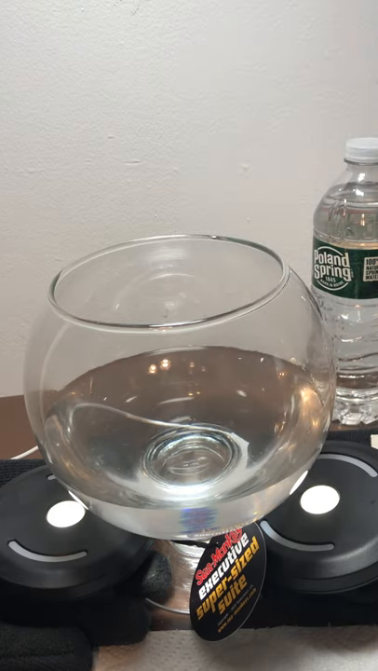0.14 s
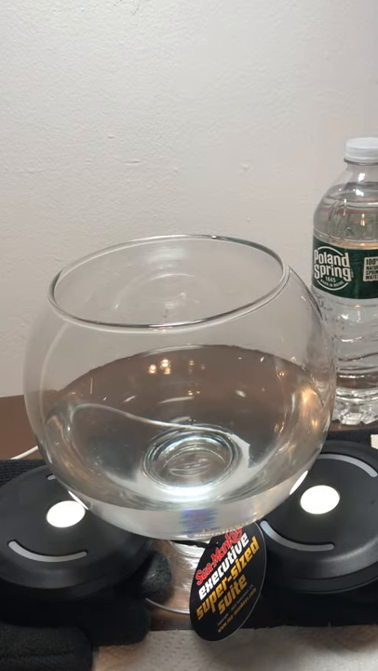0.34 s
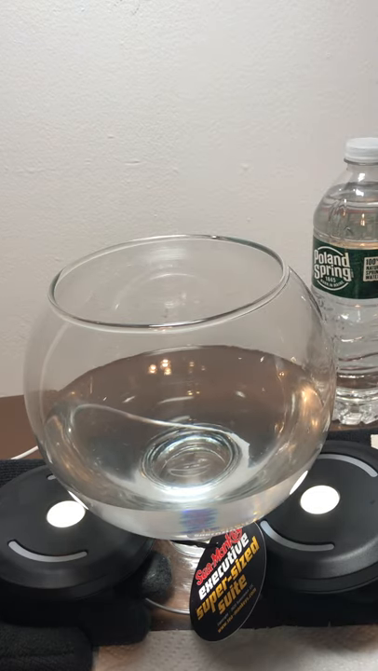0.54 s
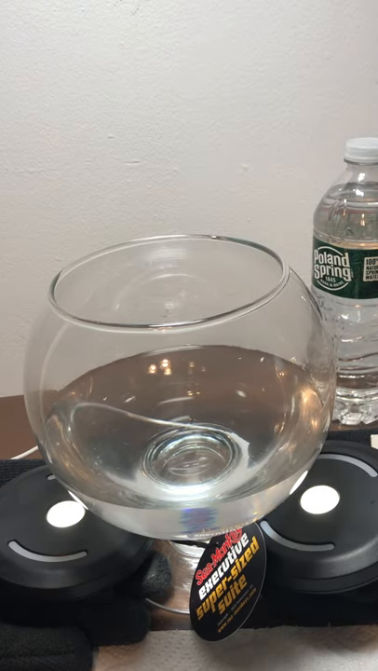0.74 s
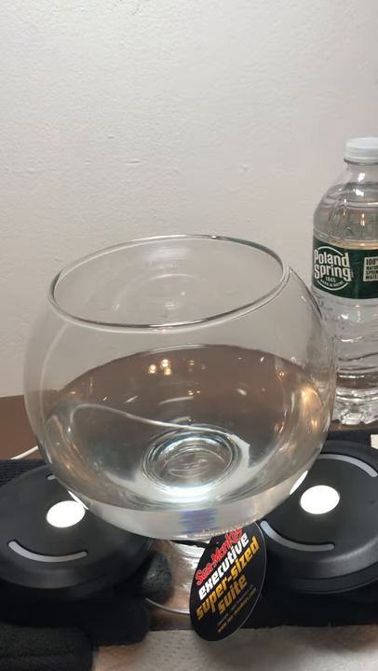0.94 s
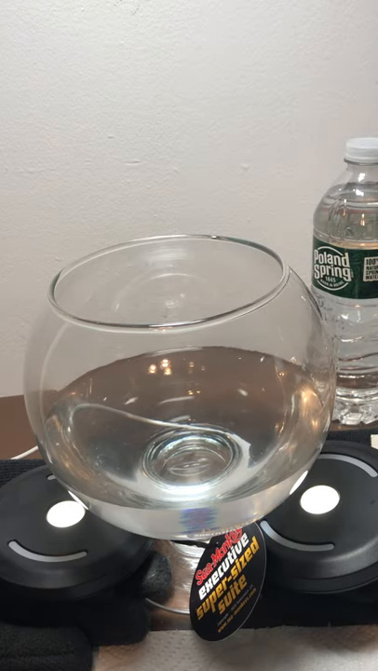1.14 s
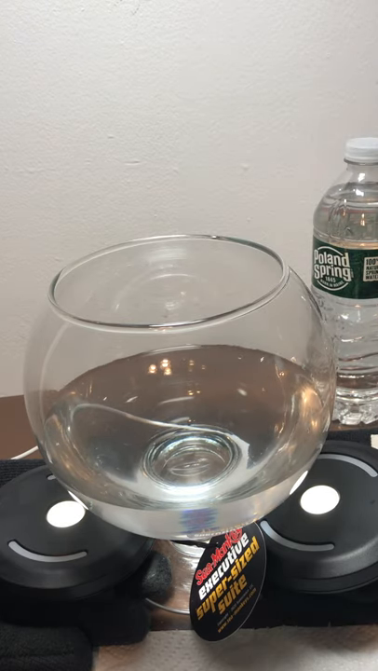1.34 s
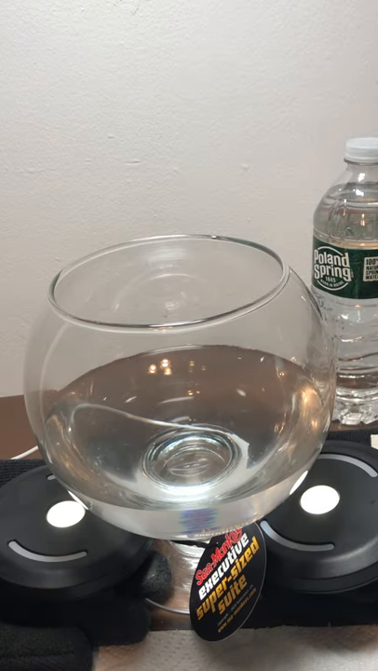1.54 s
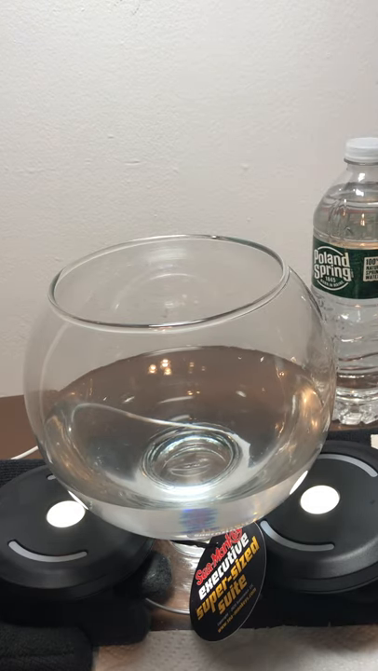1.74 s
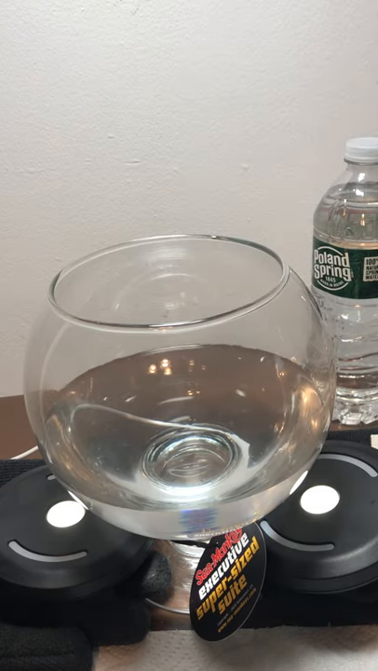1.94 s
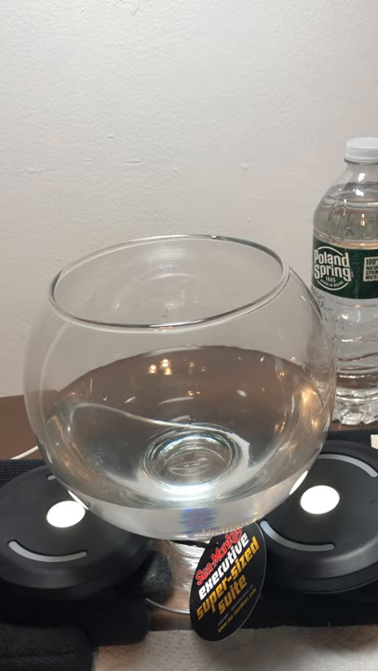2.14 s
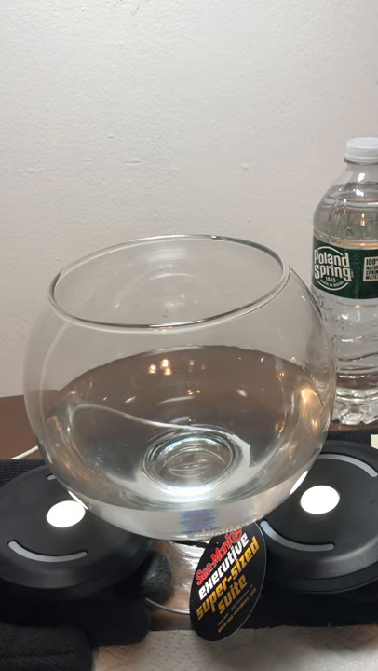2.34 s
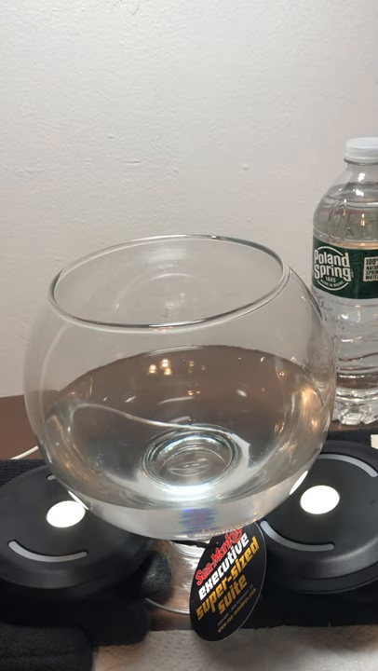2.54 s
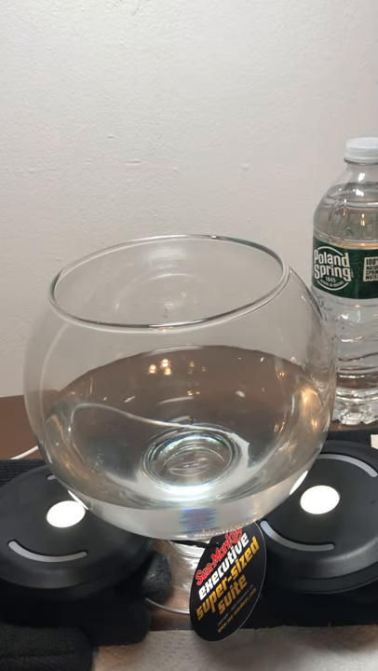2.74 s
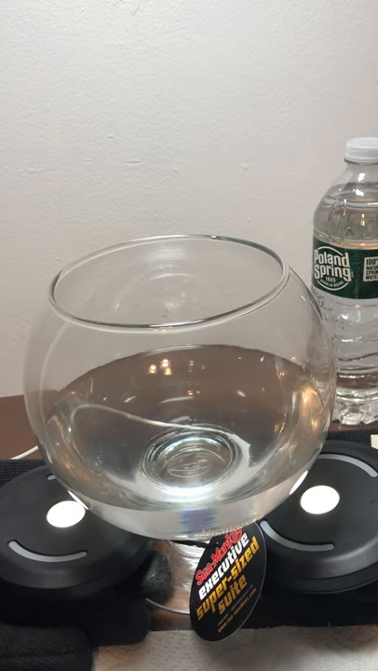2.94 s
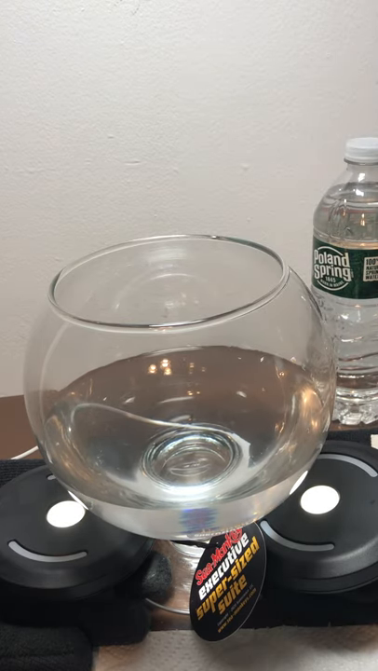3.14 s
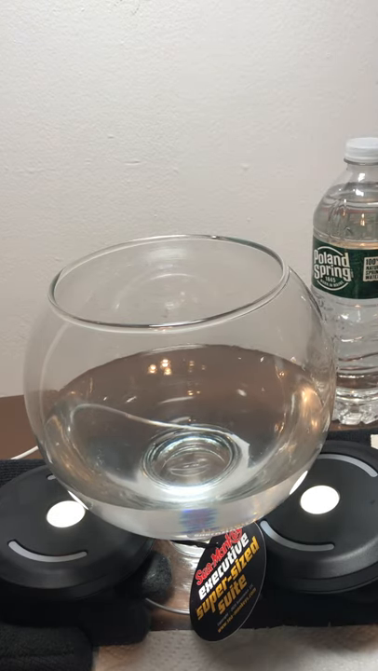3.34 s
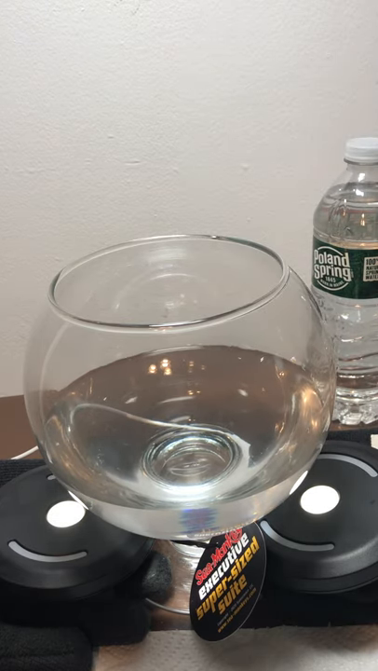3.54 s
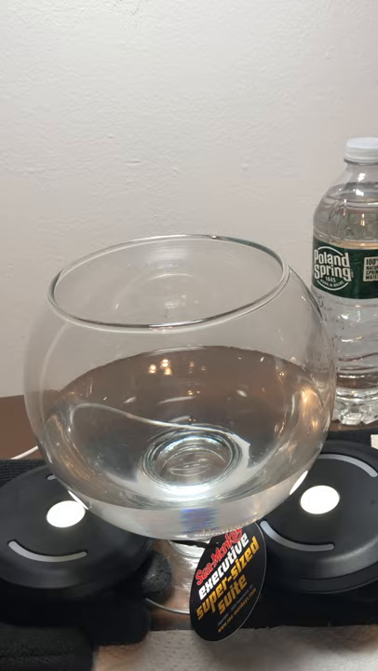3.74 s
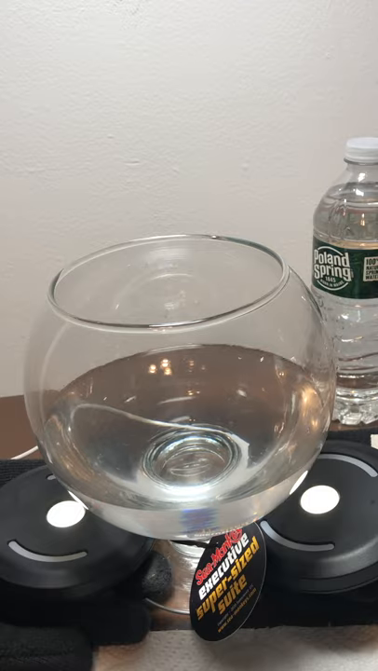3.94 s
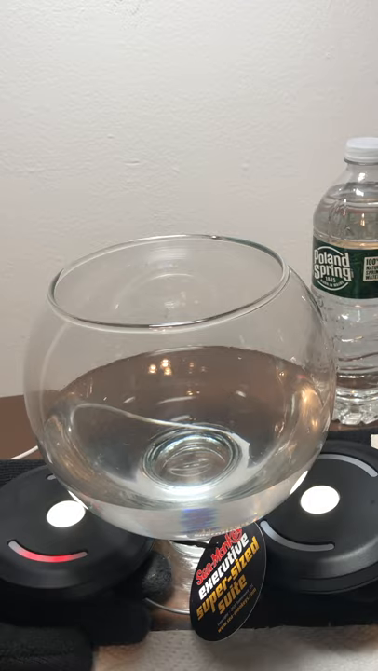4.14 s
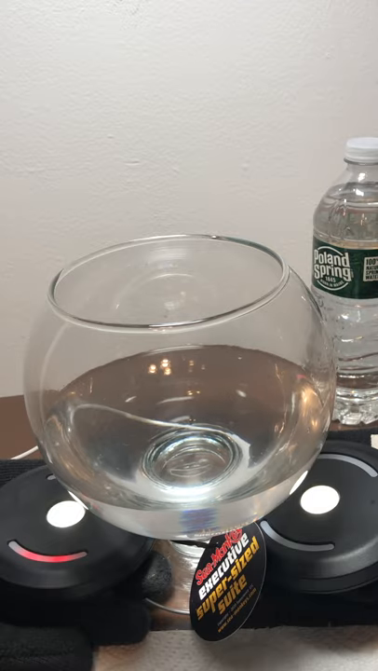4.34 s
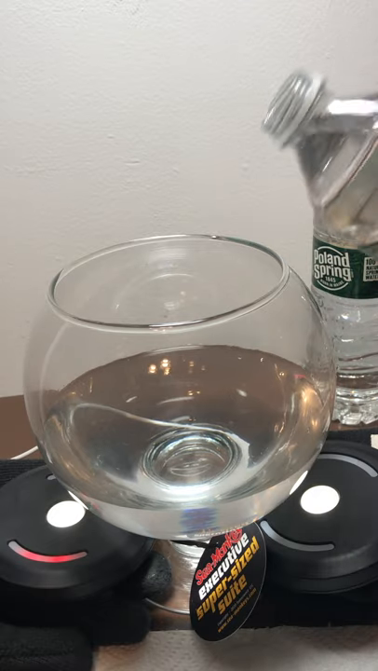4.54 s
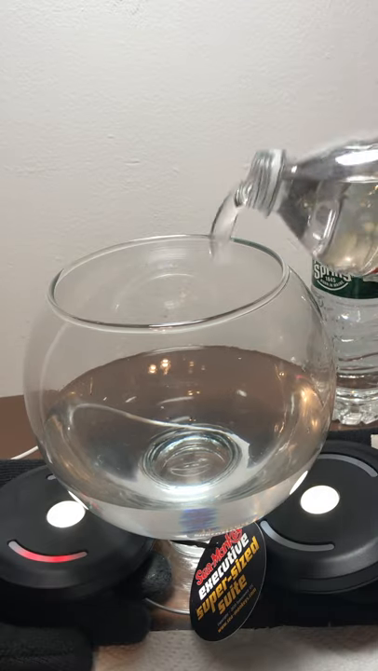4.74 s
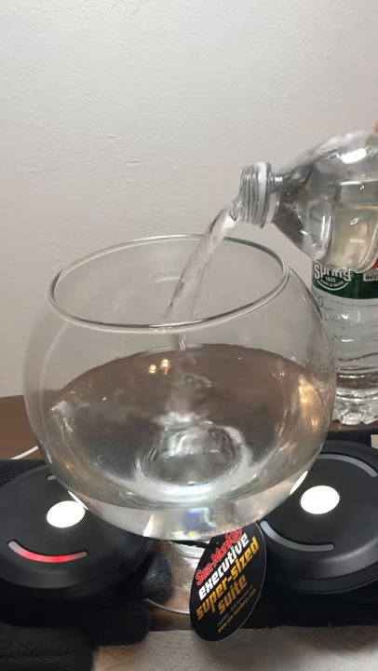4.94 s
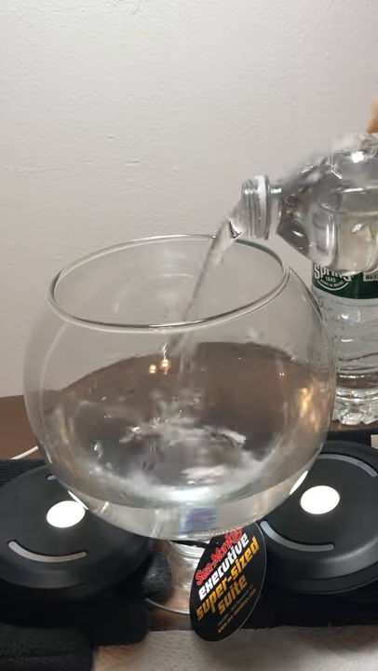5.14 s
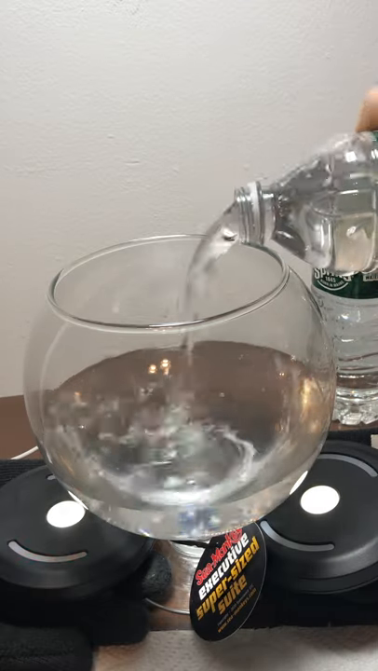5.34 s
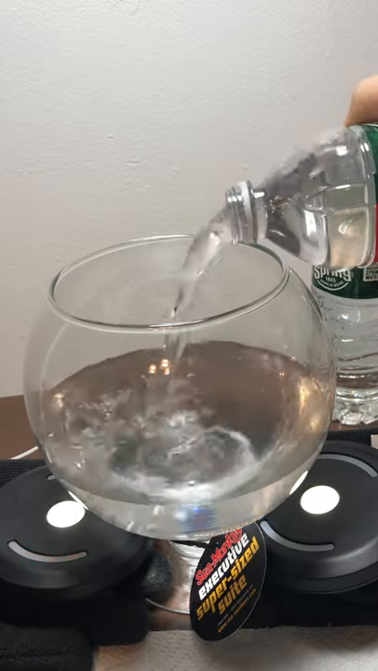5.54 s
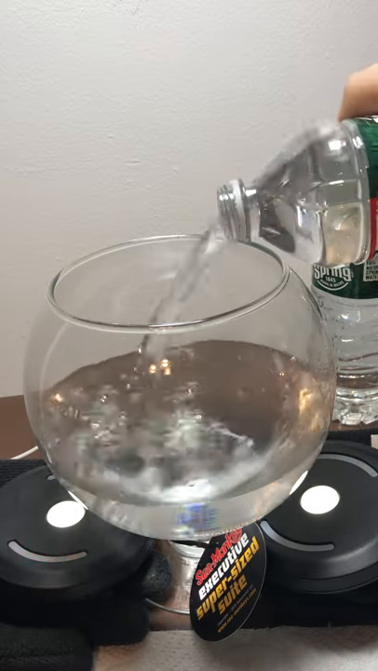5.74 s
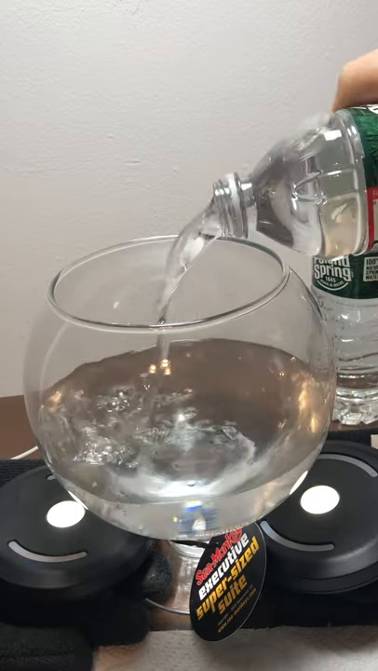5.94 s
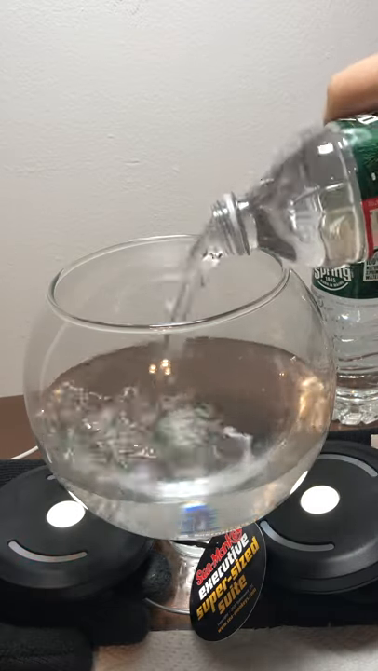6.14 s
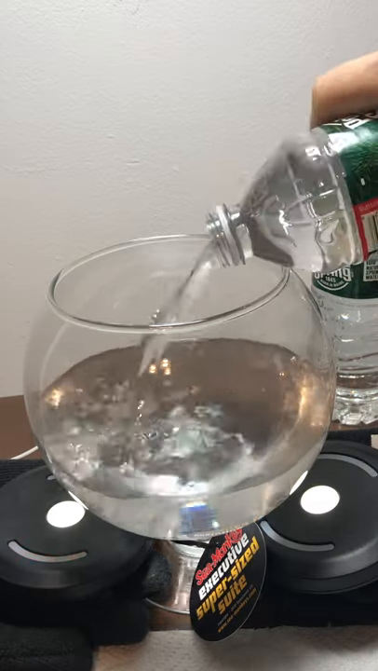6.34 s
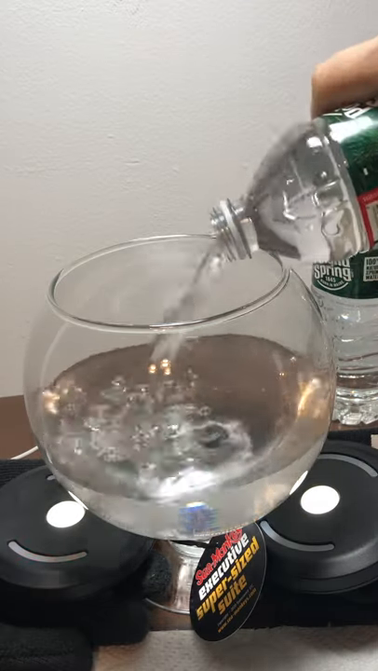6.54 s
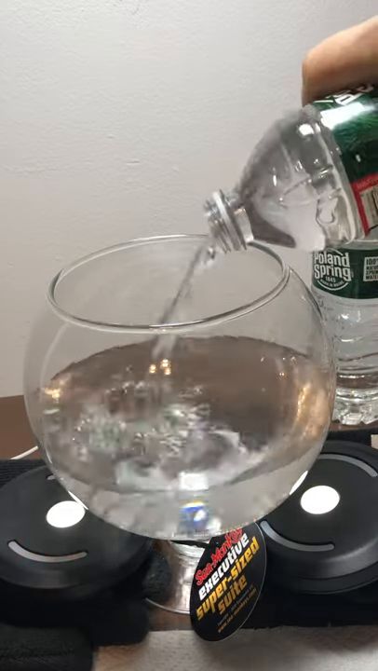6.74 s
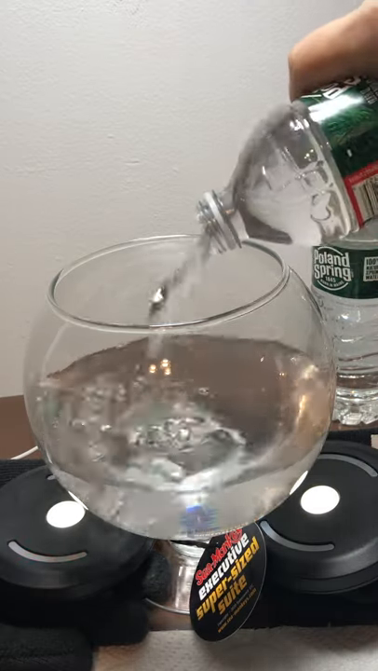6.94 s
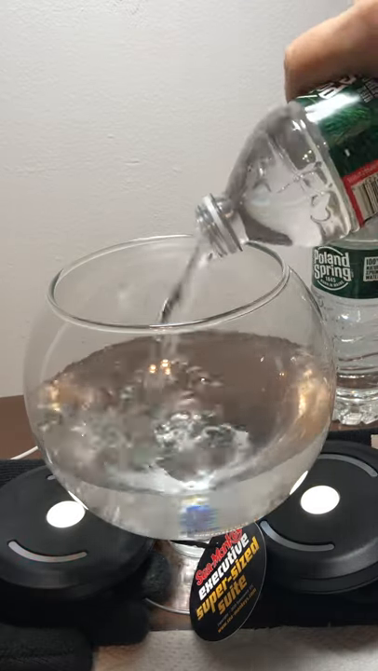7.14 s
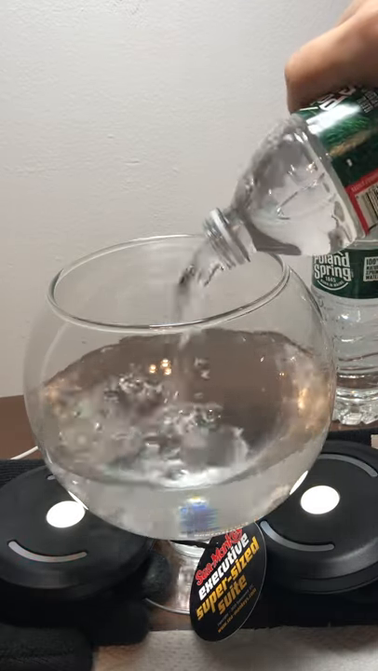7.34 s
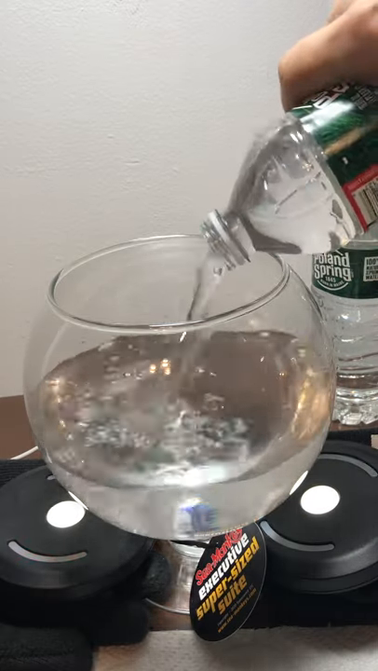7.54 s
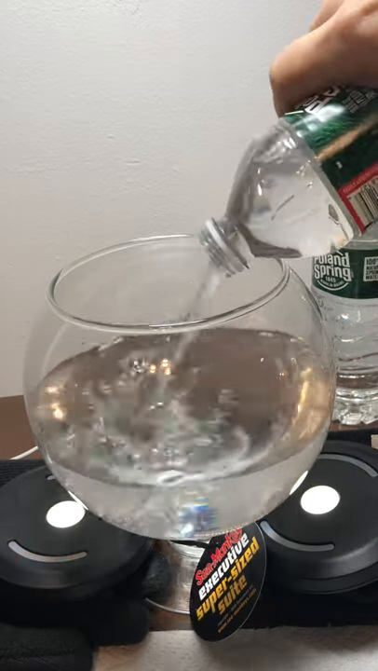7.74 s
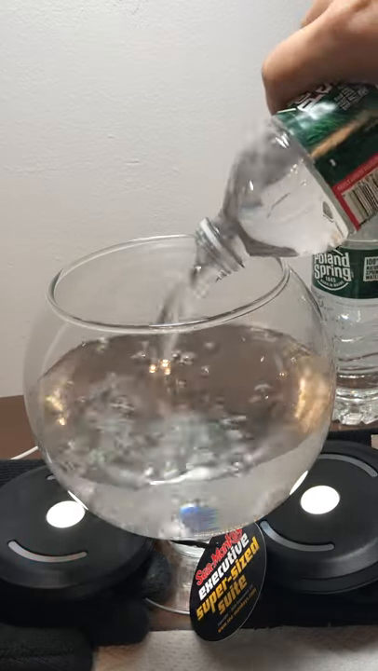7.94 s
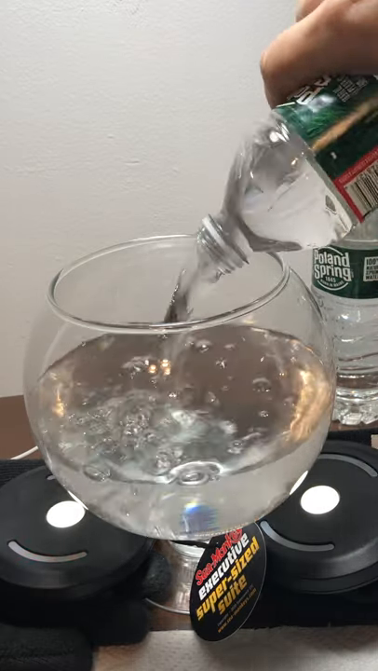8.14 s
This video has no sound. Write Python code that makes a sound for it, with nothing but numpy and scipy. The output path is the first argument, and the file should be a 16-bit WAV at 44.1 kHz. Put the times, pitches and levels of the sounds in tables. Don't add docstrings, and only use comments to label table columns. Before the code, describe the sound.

Light plastic snaps and a sharp cap crack, a pause, then lively bubbling water pouring into a round glass bowl, growing fuller until cut off.

```python
import sys
import numpy as np
from scipy import signal
from scipy.fft import rfft, irfft, next_fast_len
from scipy.io import wavfile
from scipy.ndimage import uniform_filter1d

SR = 44100
rng = np.random.default_rng(int(sys.argv[2]) if len(sys.argv) > 2 else 0)


def output_pcm(signal):
    pcm = np.clip(np.atleast_2d(signal).T, -1, 1) * 32767
    wavfile.write(sys.argv[1], SR, np.round(pcm).astype(np.int16))


def natural_amplitude(level_db):
    exponent = np.asarray(level_db, float) / 20
    return 10 ** exponent


N = 361619
TIME = np.arange(N) / SR

# start_s, flow_db
POUR = [(4.94, -78), (5.12, -69), (5.67, -65), (6.07, -61.5), (6.35, -62.5), (6.58, -59), (6.81, -61),
        (7.13, -57.5), (7.48, -63.5), (8.1, -56.5), (8.2, -56.5)]
# start_s, level_db, pitch_hz, t60_s
DEEP_BUBBLES = [(5.586, -47, 498, 0.067), (5.758, -46, 530, 0.021), (5.885, -55, 460, 0.037),
                (6.063, -49.5, 479, 0.18), (6.425, -48, 482, 0.15), (6.54, -51, 527, .08),
                (6.85, -42, 482.5, 0.15), (7.048, -35.5, 509.3, 0.12), (7.145, -36.5, 511, 0.067),
                (7.293, -45, 499, 0.12), (7.335, -52, 500, 0.1), (7.446, -28, 460, 0.042),
                (7.577, -32, 521, 0.044), (7.709, -50, 494, 0.12), (7.814, -32, 489.7, 0.17),
                (7.91, -39, 462.7, 0.042), (8.027, -42, 489, 0.23), (8.11, -34.5, 466, 0.037)]
# start_s, level_db, pitch_hz, t60_s
SLUGS = [(4.981, -34.5, 572, 0.1), (5.257, -51, 658, 0.097), (5.302, -47, 592, 0.11),
         (5.432, -36, 558.4, 0.095), (5.585, -53.5, 594, 0.11), (5.682, -43.5, 723, 0.046),
         (5.919, -44, 634, 0.054), (6.411, -42, 590.7, 0.031), (6.518, -49, 615, 0.075),
         (6.62, -38.5, 639, 0.096), (6.738, -33, 623, 0.086), (6.846, -32, 647.4, 0.04),
         (7.048, -34.5, 654, 0.066), (7.142, -31.5, 630, 0.021), (7.263, -35, 623, 0.095),
         (7.287, -46, 636, 0.03796), (7.43, -47.5, 679, 0.058), (7.445, -28.5, 633, 0.089),
         (7.575, -33, 669.5, 0.091), (7.685, -32, 613, 0.055), (7.799, -31.5, 634, 0.018),
         (7.811, -30.5, 615, 0.027), (7.941, -34.5, 589.4, 0.022), (8.023, -40.5, 659, 0.091),
         (8.109, -47, 645, 0.071), (8.138, -39.5, 616, 0.057)]
# start_s, level_db
PLOPS = [(5.435, -47.5), (5.504, -55), (5.627, -52), (5.764, -50.5), (6.135, -55), (6.258, -50.5),
         (6.375, -52), (6.483, -49), (7.164, -44), (7.447, -42), (7.578, -48), (7.811, -48), (7.934, -50)]
# start_s, level_db, pitch_hz, t60_s
RISING_BUBBLES = [(5.184, -42, 690, 0.053), (5.239, -50, 790, 0.061), (5.3, -46, 890, 0.038),
                  (5.578, -36, 744, 0.016), (5.622, -42, 873, 0.032), (5.681, -34, 740, 0.019),
                  (6.061, -32, 773, 0.02), (6.277, -50, 859, 0.043), (6.427, -38, 717, 0.093),
                  (6.544, -32.5, 756, 0.041), (7.057, -39, 745, 0.067), (7.457, -24.5, 679, 0.051),
                  (7.614, -39.5, 676, 0.071), (7.811, -29.5, 870, 0.029), (7.932, -28, 750, 0.019),
                  (8.142, -21.5, 720, 0.021)]
# start_s, level_db, starting_pitch_hz
CHIRPS = [
    (5.455, -51, 794),
    (5.695, -49.5, 450),
    (5.88, -63, 1030),
    (6.185, -51, 484),
    (7.012, -46, 736),
    (7.2, -50, 470),
    (7.228, -45.5, 850),
    (8.03, -45.5, 980),
]
# start_s, level_db, pitch_hz
GULPS = [(4.974, -56, 910), (5.238, -50, 1460), (5.3018, -58, 920), (5.6217, -43, 520), (5.68, -40, 920),
         (5.7541, -51.5, 1480), (6.016, -41, 645), (6.287, -46, 570), (6.4073, -59, 1100),
         (6.541, -39, 992), (6.7286, -44.5, 1422), (6.8358, -40, 1030), (7.0123, -50, 1150),
         (7.1416, -53, 1090), (7.2573, -47, 920), (7.4276, -47, 950), (7.4454, -33.5, 1020),
         (7.5728, -49, 908), (7.681, -48, 1030), (7.797, -37, 860), (7.905, -47, 902), (7.931, -42, 1390),
         (7.9332, -40, 1040), (8.0222, -45, 978.4), (8.1354, -41, 954)]
# start_s, level_db, pitch_hz
SMALL_BUBBLES = [(5.205, -50, 940), (5.2552, -44.5, 1600), (5.14, -52.5, 2190), (5.27, -56, 2620),
                 (5.285, -52, 1620), (5.612, -57.5, 2660), (5.81, -49, 1710), (5.865, -58, 2100),
                 (5.93, -44, 953), (6.3, -53, 864), (6.162, -55, 1106), (6.4247, -39.5, 1079),
                 (6.848, -37, 920), (7.1793, -40, 1048), (7.2885, -37, 1085), (7.478, -37, 964.4),
                 (7.538, -47, 2670), (7.64, -51, 1009), (7.7005, -45, 1060), (7.787, -43, 2340),
                 (7.7964, -42, 896)]
# crest_s, hold_s, level_db, crest_pitch_hz, fading_pitch_hz
SINGING = [(4.995, 0.031, -66, 570, 625), (5.167, 0.0081, -54, 656, 727), (5.329, 0.0073, -53, 610, 660),
           (5.459, 0.076, -55, 578, 700), (5.761, 0.04, -56, 695, 670), (5.938, 0.021, -49.5, 590, 640),
           (6.034, 0.13, -55.5, 616, 695), (6.193, 0.079, -57, 579.9, 650.2), (6.323, 0.26, -58, 635, 640),
           (6.654, 0.034, -46.5, 616, 630), (6.767, 0.0055, -47.5, 634, 700),
           (6.876, 0.068, -43.5, 630, 640), (7.088, 0.047, -38, 640, 645), (7.286, 0.035, -40.5, 635, 650),
           (7.503, 0.071, -44.5, 630, 636), (7.599, 0.017, -39, 627, 691.4), (7.85, 0.01, -42, 615, 620),
           (7.898, 0.01, -41.5, 632, 641.5), (7.975, 0.042, -46.5, 633.4, 650),
           (8.19, 0.019, -47.5, 619, 619)]
# start_s, level_db, first_droplet_pitch_hz
SPRAYS = [(4.9793, -36.5, 4900), (5.0404, -44, 4830), (5.29, -38.5, 8000), (5.599, -40.5, 4160),
          (5.639, -42, 9300), (5.6812, -36, 8300), (5.7914, -40.5, 10450), (5.9288, -41.5, 7260),
          (5.9556, -42.5, 6500), (5.999, -40, 5777), (6.0779, -43, 4860), (6.185, -41.5, 5860),
          (6.425, -31, 9100), (6.5401, -31.5, 7320), (6.6227, -40, 6400), (7.1605, -30.5, 7710),
          (7.2584, -34.5, 9110), (7.4895, -36, 12600), (7.679, -39, 3270), (7.812, -28, 6960),
          (7.9348, -25, 8110), (8.022, -29, 3360), (8.1069, -40, 7060), (8.157, -31, 9400)]
# start_s, level_db, first_droplet_pitch_hz
PLINKS = [(5.1313, -43.5, 3950), (5.1483, -34.5, 3510), (5.468, -38, 6200), (5.8101, -33.5, 6200),
          (6.038, -42, 5550), (6.518, -39.5, 5160), (6.7358, -29, 8000), (6.8442, -23.5, 4920),
          (6.9755, -39, 4578), (7.058, -23.5, 5050), (7.143, -27, 5765), (7.1976, -37, 7680),
          (7.442, -27, 3163), (7.575, -24, 3420), (7.6888, -23, 6850), (7.893, -39, 3450),
          (7.911, -26, 12160), (8.0002, -54, 6460)]
# start_s, level_db, pitch_hz
SPITS = [(4.9531, -51, 4860), (5, -37, 6250), (5.018, -39, 4950), (5.067, -44, 7100), (5.0848, -50, 6920),
         (5.1844, -51, 6000), (5.279, -45, 4260), (5.302, -40, 8400), (5.431, -46.5, 5900),
         (5.445, -41.5, 6440), (5.6114, -40.5, 4920), (5.8007, -37.5, 6350), (5.8974, -44, 6356),
         (6.0588, -42.5, 4854), (6.0923, -37.5, 7820), (6.1281, -44.5, 7300), (6.168, -45, 5000),
         (6.2024, -43, 8700), (6.2281, -55, 8500), (6.2701, -39.5, 5010), (6.344, -48, 4640),
         (6.4117, -31, 4740), (6.4839, -41, 9070), (6.506, -39, 4970), (6.6003, -58, 3940),
         (6.633, -31.5, 9100), (6.691, -52, 3550), (6.7248, -33, 8120), (6.806, -48, 4000),
         (6.9124, -38, 7100), (7.043, -32, 5200), (7.097, -43, 4560), (7.2085, -39.5, 3778),
         (7.232, -46, 8820), (7.2717, -33, 9130), (7.3372, -46, 8700), (7.426, -45, 6830),
         (7.4412, -37, 5980), (7.547, -46, 3366), (7.584, -32, 9000), (7.715, -41, 3700),
         (7.7356, -41, 7800), (7.7737, -46, 7780), (7.985, -41, 6350), (8.077, -43, 3460)]
# start_s, level_db, pitch_hz
MIST = [(4.9854, -36, 9400), (5.0404, -38, 13900), (5.0779, -41, 10400), (5.3887, -51, 15200),
        (5.5564, -48, 10100), (5.6388, -58, 9980), (5.9479, -42, 11700), (6.1484, -42, 15200),
        (6.1894, -44, 12900), (6.3355, -42.5, 11900), (6.3699, -37, 15100), (6.4067, -41, 10900),
        (6.47, -54, 9500), (6.6697, -49, 13790), (7.0212, -40.5, 11690), (7.0891, -37, 13400),
        (7.2085, -54, 12000), (7.3302, -35.5, 11300), (7.3594, -44, 10900), (7.4736, -50, 12230),
        (7.6316, -47, 14700), (7.66, -46, 9600), (8.0396, -27.5, 10980), (8.1342, -44, 10780)]
# (start_s, level_db)
KNOCKS = [
    (1524, 0.19, [(5.207, -56), (5.4745, -58.5), (5.675, -55.5), (5.78, -63), (6.0839, -56), (6.2, -61), (6.4437, -52.5), (6.7293, -48), (6.859, -47), (7.258, -50), (7.4948, -48.5), (7.5814, -49), (7.6806, -57.5), (7.8136, -52.5), (8.0494, -52.5), (8.1914, -43.5)]),
    (1720, 0.63, [(5.655, -58.5), (6.065, -68), (6.6476, -61), (7.33, -69)]),
    (2375, 0.086, [(5.63, -63), (5.9, -61), (6.0156, -53), (6.386, -55), (6.54, -48.5), (6.8354, -44), (7.2569, -46), (7.4444, -38.5)]),
    (9000, 0.067, [(6.636, -43.5), (6.852, -50)]),
    (2970, 0.072, [(5.15, -57), (5.31, -63), (5.43, -67), (5.52, -63), (5.78, -59), (5.915, -60), (6.0156, -50), (6.27, -51), (6.4255, -48), (6.5174, -44.5), (6.54, -44.5), (6.62, -54), (6.7287, -43), (6.8505, -49), (7.0423, -47), (7.5757, -37), (7.7132, -44), (7.8109, -40), (7.93, -48), (8.0233, -41), (8.06, -55), (8.13, -54)]),
]
# pitch_hz, width_hz, level_db
GLASS = [(1534, 47, 1), (1748, 4.3, -8.5), (2400, 23, -6.5), (2970, 45, 0), (3450, 300, -15)]
# freq_hz, density_db (per Hz)
FIZZ = [(2600, -20), (4000, -9.5), (7000, -12.5), (11000, -23), (16000, -10)]
# freq_hz, density_db (per Hz)
CHURN = [(60, -6), (120, 6.5), (300, 3), (450, 0), (900, -5), (1400, -9.5), (2200, -16.5), (4000, -72)]
# start_s, level_db, centre_hz
CRACKLES = [(0.585, -56, 2390), (0.6144, -50, 9400), (0.7188, -54.5, 3270), (0.939, -41, 4220),
            (1.0804, -39.5, 7300), (1.0798, -46.5, 1880), (1.155, -55, 4340), (1.1944, -58, 2780),
            (1.355, -63, 9000), (1.375, -55, 2650), (1.4, -64, 9500), (1.6235, -53.5, 2080),
            (1.664, -52.5, 6360), (1.715, -65, 6000), (2.7118, -30, 8200), (1.775, -38, 7360),
            (1.7766, -48.5, 3500), (1.937, -37.5, 7140), (2.1126, -46, 3200), (2.145, -59, 4800),
            (2.6893, -26, 8800), (2.412, -58, 2960), (2.533, -45, 9000), (2.649, -47, 1760),
            (2.6896, -19, 4670), (2.7123, -28, 3800), (2.922, -52, 3080), (3.079, -54.5, 3080),
            (3.117, -71, 3260), (3.1399, -44, 2970), (3.335, -58, 3500), (4.4552, -55.5, 4030)]
# start_s, level_db, pitch_hz, t60_s
PINGS = [(0.006, -59, 800, 0.49), (0.072, -65, 1370, 0.2), (1.6221, -51, 2000, 0.036),
         (2.229, -57.5, 1460, 0.038), (1.0804, -48, 1165, 0.013), (1.375, -55, 1010, 0.021),
         (1.6235, -59, 790, 0.05), (2.65, -46.5, 1320, 0.033), (2.651, -47, 780, 0.016),
         (2.6894, -48, 638.9, 0.011), (2.6896, -29.5, 3180, 0.011), (2.7112, -32, 3640, 0.026),
         (.9393, -56, 830, .015), (.7183, -53, 3500, 0.027), (3.1398, -56, 1050, 0.048),
         (3.337, -49, 1410, 0.035)]
# start_s, length_s, level_db, centre_hz, width_share (of the centre)
RUSTLE = [(0, 0.26, -63.5, 975, 1.2), (0, 0.31, -68, 2700, 0.71), (0.579, 0.25, -64.5, 267, 0.57),
          (1.104, 0.062, -64.5, 197, 0.51), (1.125, 0.12, -64.5, 8000, 3.3), (1.932, 0.048, -62, 280, 0.49),
          (2.264, 0.13, -62, 283, 0.7), (2.247, 0.16, -67, 7900, 3.5), (2.691, 0.095, -59, 135, 0.77),
          (3.062, 0.12, -69, 2370, 1.6), (3.716, 0.25, -75.5, 9000, 2.6), (3.977, 0.14, -67.5, 7550, 2.7)]
# freq_hz, density_db (per Hz)
AIR = [(24, -51), (66, -9.5), (101, 2), (467, -9.5), (1600, -18.5), (2400, -14.5), (5300, -23),
       (15500, -33)]
# line_hz, line_db, rumble_hz, rumble_width_hz, rumble_db
HUM = (59, -66, 131.5, 26, -75)
# pitch_hz, level_db
WHINE = [(4900, -87), (5900, -92.5)]
# freq_hz, t60_s
ROOM = [(300, 0.23), (2000, 0.27), (6000, 0.24), (14000, 0.21)]


def glugs():
    out, t = np.zeros(N), np.arange(1500) / SR
    slap_band = signal.butter(2, [250, 2200], "band", fs=SR, output="sos")
    slaps = evened(signal.sosfilt(slap_band, rng.standard_normal((len(SLUGS), len(t)))))
    sizes, sheds = rng.random(len(SLUGS)), rng.random((len(SLUGS), 5, 3))
    for s, db, hz, t60 in DEEP_BUBBLES:
        add(out, s, bubble(db + 9.5, hz, t60, rise=0.43, plunge=0.28))
    for (s, db, hz, t60), size, slap, shed in zip(SLUGS, sizes, slaps, sheds):
        add(out, s, bubble(db + 8.5, hz, t60, rise=0.54, plunge=0.26))
        push_hz = 200 + 220 * size
        add(out, s, natural_amplitude(db - 3.0) * np.sin(2 * np.pi * push_hz * t) * np.exp(-t / 0.0035))
        add(out, s - 0.002, natural_amplitude(db - 18.5) * slap * np.exp(-t / 0.0083))
        for late, pitch, small in shed:
            shed_db = db - 14.5 - 10 * small - 8 * late
            add(out, s + 0.07 * late, bubble(shed_db, 330 * 5 ** pitch, 0.035, rise=12.0))
    for s, db in PLOPS:
        add(out, s, bubble(db + 6.5, hz=166, t60=0.051, swell_s=0.0041, plunge=-0.41))
    add(out, 7.179, natural_amplitude(-34) * slaps[0] * np.exp(-t / 0.0018))
    for s, db, hz, t60 in RISING_BUBBLES:
        add(out, s, bubble(db + 3, hz, t60, rise=4.25, swell_s=0.002))
    for s, db, hz in CHIRPS:
        add(out, s, bubble(db + 5.5, hz, t60=0.095, rise=11.0, swell_s=0.006))
    for s, db, hz in GULPS:
        add(out, s, bubble(db + 5.0, hz, t60=0.025, swell_s=0.00086, plunge=-0.36))
    for s, db, hz in SMALL_BUBBLES:
        add(out, s, bubble(db + 3, hz, t60=0.033, rise=7, swell_s=0.002))
    return out


def bowl_air():
    swell_db_per_s, fade_db_per_s, quiet_db, glide_s = 256, 385, -65.0, 0.0305
    pitch_waver, level_waver = slow_waver((2, N), 350)
    crest, hold, top_db, crest_hz, fade_hz = np.transpose(SINGING)

    marks = np.maximum.accumulate(np.ravel([crest, crest + hold + glide_s], "F"))
    hz = np.interp(TIME, marks, np.ravel([crest_hz, fade_hz], "F"))

    level_db = np.full(N, quiet_db)
    for at, held, peak_db in zip(crest, hold, top_db):
        early = np.maximum(at - TIME, 0)
        late = np.maximum(TIME - at - held, 0)
        level_db = np.maximum(level_db, peak_db - swell_db_per_s * early - fade_db_per_s * late)

    note = np.sin(2 * np.pi * np.cumsum(hz * (1 + 0.00842 * pitch_waver)) / SR)
    shaken = noise_band(rng.standard_normal(N), hz, 85)
    fade_in = np.clip((TIME - crest[0]) / 0.0092, 0, 1)
    return natural_amplitude(level_db + 1.2 + 1.5 * level_waver) * (note + 0.17 * shaken) * fade_in


def splashes():
    out, t = np.zeros(N), np.arange(2500) / SR
    bursts = [(*row, 0.035, -11.5) for row in SPRAYS] + [(*row, 0.049, -18.5) for row in PLINKS]
    bursts = sorted(bursts)
    scatter = rng.random((len(bursts), 14, 3))
    noise = rng.standard_normal((len(bursts), 2, len(t)))
    for (s, db, hz, t60, hiss_db), drops, (hiss, rag) in zip(bursts, scatter, noise):
        colour_hz = 0.7 * hz + 1500 + 2500 * drops[0, 0]
        hiss = noise_band(hiss, colour_hz, 6500)
        hiss = hiss * natural_amplitude(4.0 * evened(uniform_filter1d(rag, 150)))
        add(out, s, droplet(db - 4.0, hz, cycles=10.0))
        add(out, s, natural_amplitude(db + hiss_db + 4.0 - 60 * t / t60) * (1 - np.exp(-t / 0.0014)) * hiss)
        for late, pitch, size in drops:
            drop_db = db - 10.0 - 14 * late - 8 * size
            add(out, s + 0.58 * t60 * late ** 1.3, droplet(drop_db, 3000 * 5 ** pitch, cycles=5.4))
    return out


def spits():
    out, t = np.zeros(N), np.arange(2500) / SR
    rows = [(*row, 0.035, 0.81) for row in SPITS] + [(*row, 0.032, 0.25) for row in MIST]
    noises, neighbours = rng.standard_normal((len(rows), len(t))), rng.random((len(rows), 3, 2))
    for (s, db, hz, t60, wide), noise, near in zip(rows, noises, neighbours):
        puff = noise_band(noise, hz, wide * hz)
        add(out, s, natural_amplitude(db - 13.0 - 60 * t / t60) * (1 - np.exp(-t / 0.0013)) * puff)
        add(out, s, droplet(db - 9.0, hz, cycles=22.0))
        for late, pitch in near:
            near_hz = min(hz * (0.7 + 0.7 * pitch), 15500)
            add(out, s + 0.013 * late, droplet(db - 11.0, near_hz, cycles=15.6))
    return out


def glass():
    notes = np.zeros(N)
    for hz, width, db in GLASS:
        ring = bubble(0, hz, 2.9 / width, swell_s=0.00077)
        notes += natural_amplitude(db) * evened(signal.oaconvolve(click_train(200, 5.0), ring)[:N])
    out = natural_amplitude(pour_flow_db() - 11) * notes * (TIME > POUR[0][0])
    for hz, t60, hits in KNOCKS:
        for (s, db), off in zip(hits, rng.uniform(-0.95, 1, len(hits))):
            add(out, s, bubble(db, hz * (1 + 0.0141 * off), t60, swell_s=0.00054))
    return out


def fizz():
    fading = np.exp(-np.arange(1500) / SR / 0.0035)
    clumps = [0.08 + signal.oaconvolve(click_train(30, 2.5), fading)[:N] for band in range(8)]
    bubbles = np.zeros(N)
    for k, hz in enumerate(np.geomspace(2600, 15000, 18)):
        grain = droplet(0, hz, cycles=8.0)
        grain = grain / np.linalg.norm(grain) * np.sqrt(hz) * natural_amplitude(read(FIZZ, hz))
        clumping = clumps[k // 3] + clumps[(k + 2) // 3 + 1]
        bubbles += signal.oaconvolve(click_train(450, 2.8) * clumping, grain)[:N]

    lumps = natural_amplitude(3.0 * evened(uniform_filter1d(rng.standard_normal(N), 900)))
    churn = coloured(rng.standard_normal(N) * lumps, CHURN)
    for start, pitch, size in rng.random((300, 3)):
        stray = bubble(11 - 14 * size, 700 * 3.6 ** pitch, 0.03, rise=14.0, swell_s=0.002)
        add(churn, POUR[0][0] + 3.25 * start, stray)

    flow_db = pour_flow_db()
    churn_db = -61.5 + 1.22 * (flow_db + 60)
    return (natural_amplitude(flow_db - 4.5) * evened(bubbles) + natural_amplitude(churn_db) * churn) * (TIME > POUR[0][0])


def crackles():
    out = np.zeros(N)
    for (s, db, hz), noise in zip(CRACKLES, rng.standard_normal((len(CRACKLES), 4000))):
        rattle_s = 0.04 * natural_amplitude(-0.53 * (db + 40))
        add(out, s, burst(db, hz, rattle_s, noise))
    out = signal.sosfilt(signal.butter(2, 1500, "high", fs=SR, output="sos"), out)
    for s, db, hz, t60 in PINGS:
        add(out, s, bubble(db, hz, t60, swell_s=0.00023))
    return out


def rustle():
    out = np.zeros(N)
    noises = rng.standard_normal((len(RUSTLE), 2, SR // 3))
    for (s, length, db, hz, wide), (noise, grain) in zip(RUSTLE, noises):
        grainy = noise * natural_amplitude(2.2 * evened(uniform_filter1d(grain, 200)))
        band = noise_band(grainy, hz, wide * hz)
        along = np.arange(int(length * SR)) / (length * SR)
        swell = np.sin(np.pi * along) if s > 0.1 else np.cos(np.pi / 2 * along)
        add(out, s, natural_amplitude(db) * swell * band[:len(along)])
    return out


def room_air():
    line_hz, line_db, rumble_hz, width, rumble_db = HUM
    waver = slow_waver(N, 3000)
    line = natural_amplitude(line_db + 3 + 2.9 * waver) * np.sin(2 * np.pi * line_hz * TIME + 0.5 * waver[::-1])
    rumble = noise_band(rng.standard_normal(N), rumble_hz, width)
    whine = sum(natural_amplitude(db) * np.sin(2 * np.pi * hz * TIME) for hz, db in WHINE)
    whine_waver = evened(uniform_filter1d(rng.standard_normal(N), 2500))
    whine = whine * natural_amplitude(7.0 * np.minimum(whine_waver, 1.6) - 4)
    hiss = natural_amplitude(-67.5) * coloured(rng.standard_normal(N), AIR)
    return hiss + whine + line + natural_amplitude(rumble_db) * rumble


def room(x):
    taps = np.zeros(SR // 2)
    at = np.arange(120, SR // 2 - 20, 20)
    taps[at + rng.integers(0, 20, len(at))] = rng.choice([-1.0, 1.0], len(at))
    hz, t, z = signal.stft(taps, SR, nperseg=256)
    tail = signal.istft(z * natural_amplitude(-60 * t / read(ROOM, hz)[:, None]), SR, nperseg=256)[1]
    return signal.oaconvolve(x, tail / np.linalg.norm(tail))[:N]


def bubble(db, hz, t60, rise=0.0, swell_s=0.0014, plunge=0.0):
    t = np.arange(int(min(t60, 0.5) * SR) + 50) / SR
    turns = hz * (t + rise * t ** 2 / 2 - plunge * 0.002 * np.exp(-t / 0.0024))
    swell = 1 - np.exp(-(t / swell_s) ** 2)
    return natural_amplitude(db - 60 * t / t60) * swell * np.sin(2 * np.pi * turns)


def droplet(db, hz, cycles):
    return bubble(db, hz, np.log(1000) * cycles / hz, rise=4.3, swell_s=0.63 / hz)


def burst(db, hz, t60, noise):
    t = np.arange(len(noise)) / SR
    puff = noise_band(noise, hz, 0.92 * hz) + natural_amplitude(-4) * evened(resonate(noise, hz, 1.1 * hz))
    puff = puff * natural_amplitude(1.8 * evened(uniform_filter1d(noise[::-1], 120)))
    snap = natural_amplitude(-1.5) * np.cos(2 * np.pi * hz * t) * np.exp(-t * hz / 2.7)
    return natural_amplitude(db) * (snap + natural_amplitude(-11.5 - 60 * t / t60) * puff)


def click_train(per_s, spread_db):
    out, count = np.zeros(N), int(per_s * N / SR)
    out[rng.integers(0, N, count)] = natural_amplitude(spread_db * np.minimum(rng.exponential(1, count), 4))
    return out


def pour_flow_db():
    return np.interp(TIME, [row[0] for row in POUR], [row[1] for row in POUR])


def slow_waver(shape, smoothing):
    return evened(uniform_filter1d(uniform_filter1d(rng.standard_normal(shape), smoothing), smoothing))


def resonate(x, hz, width):
    turn = np.exp(2j * np.pi * np.cumsum(hz * np.ones(len(x))) / SR)
    r = np.exp(-np.pi * width / SR)
    return 2 * (turn * signal.lfilter([1 - r], [1, -r], x / turn + 1e-18)).real


def noise_band(noise, hz, width):
    return evened(resonate(resonate(noise, hz, width), hz, width))


def coloured(x, points):
    size = next_fast_len(N)
    gain = natural_amplitude(read(points, np.fft.rfftfreq(size, 1 / SR)))
    return evened(irfft(rfft(x, size) * gain, size)[:N])


def read(points, hz):
    f, value = np.transpose(points)
    return np.interp(np.log(hz + 1), np.log(f + 1), value)


def evened(x):
    return x / np.sqrt(np.mean(x ** 2) + 1e-20)


def add(mix, s, sound):
    part = mix[round(s * SR):][:len(sound)]
    part += sound[:len(part)]


def scene():
    water = glugs() + bowl_air() + splashes() + spits() + glass() + fizz()
    hand = crackles()
    wet = room(natural_amplitude(-7.5) * hand + natural_amplitude(-11.0) * water)
    return (water + hand + wet + rustle() + room_air())[None]


def roll_off(x):
    return signal.sosfilt(signal.butter(12, 16780, fs=SR, output="sos"), x)


def record(dry):
    thin = signal.sosfilt(signal.butter(2, 45, "high", fs=SR, output="sos"), dry)
    thin = signal.sosfilt(signal.cheby2(20, 30, 16150, fs=SR, output="sos"), thin)
    return roll_off(thin)


dry = scene()
out = record(dry)
output_pcm(out)
```